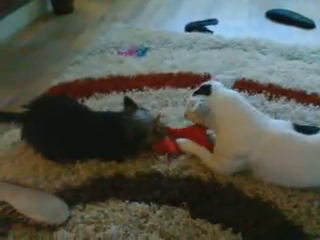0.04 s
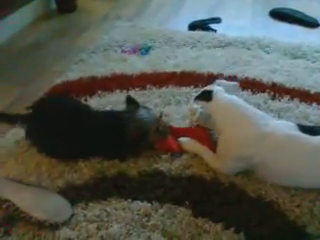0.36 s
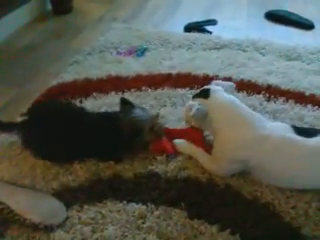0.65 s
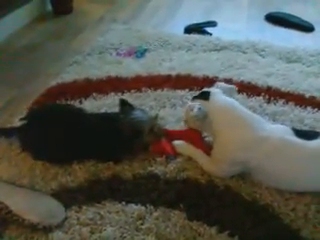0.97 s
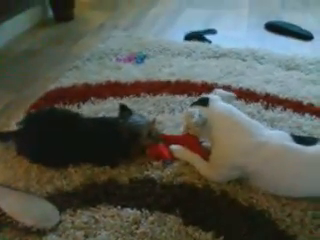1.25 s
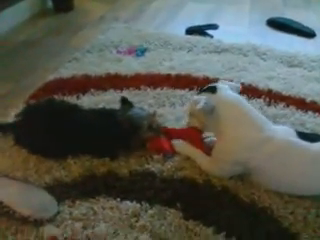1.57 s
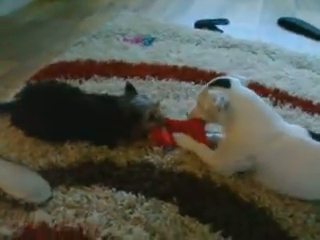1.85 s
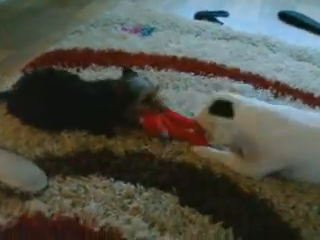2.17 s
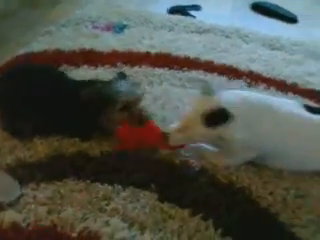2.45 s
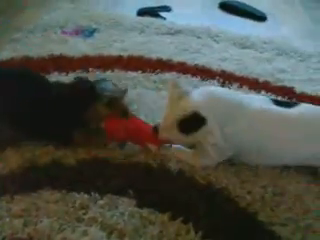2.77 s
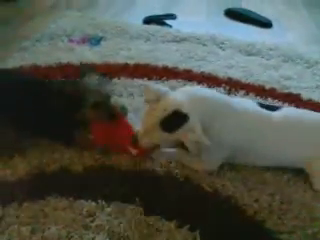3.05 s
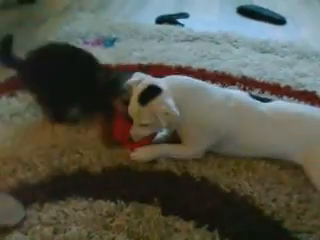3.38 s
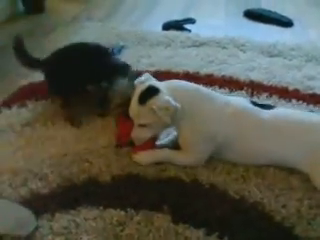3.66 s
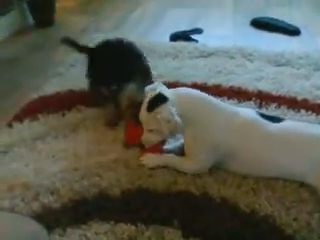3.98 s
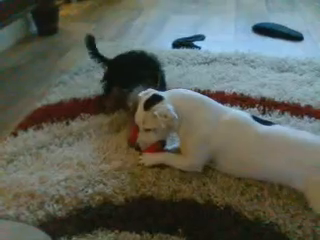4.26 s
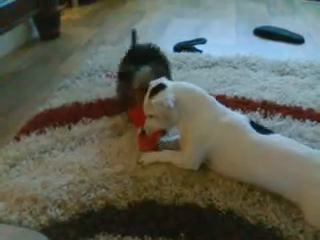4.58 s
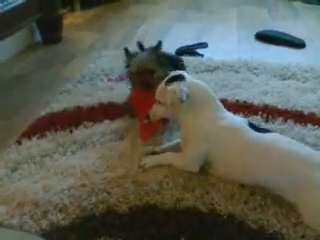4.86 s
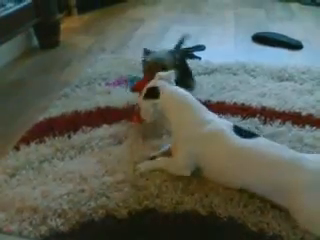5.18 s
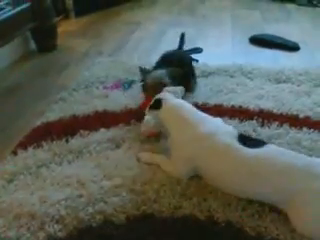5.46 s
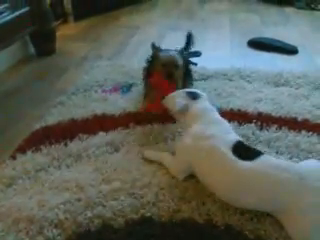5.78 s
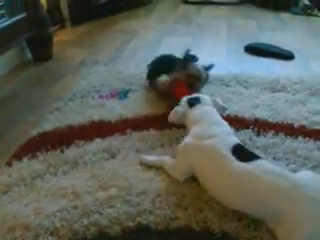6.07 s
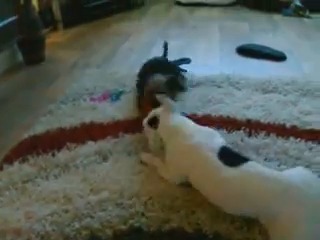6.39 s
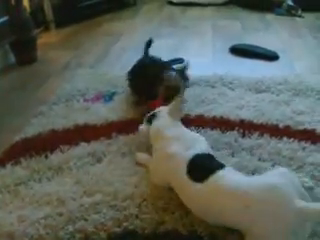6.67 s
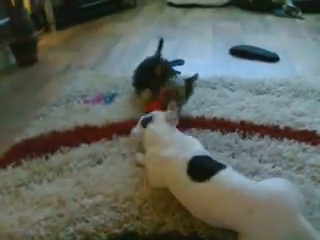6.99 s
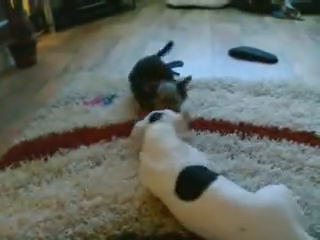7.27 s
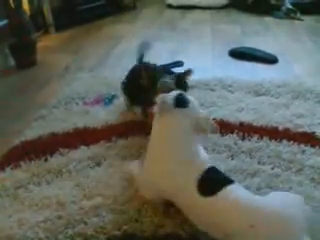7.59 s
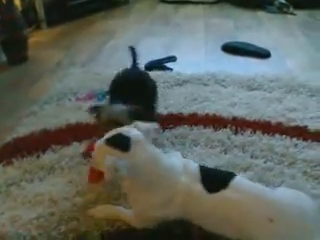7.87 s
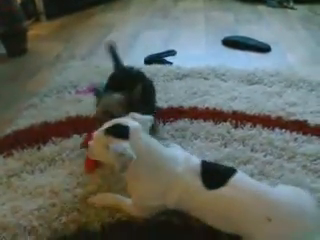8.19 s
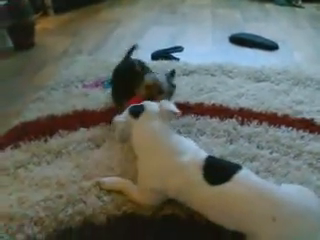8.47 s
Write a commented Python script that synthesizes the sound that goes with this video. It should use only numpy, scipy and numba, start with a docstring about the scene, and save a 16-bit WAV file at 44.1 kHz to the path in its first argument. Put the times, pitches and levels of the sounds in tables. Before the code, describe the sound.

Close, throaty puppy growls come in short repeated bursts during a tug of war, broken by nasal snorts and tooth clicks.

```python
"""Puppy tugging at a toy

A small puppy growls seven times while tugging a toy from another dog on a living-room rug. Each growl
is a rough voice, chopped by a flutter of the throat and shaped by throat and mouth resonances; several
end in a snort through the nose. Brief calls and huffs come between, paws and toy scuff the rug, teeth
click, and a dull microphone close by picks it all up with the reflections of the room."""
import sys
import numpy as np
from scipy import signal
from scipy.fft import rfft, irfft
from scipy.io import wavfile
from scipy.ndimage import uniform_filter1d
from numba import njit

SR = 44100
rng = np.random.default_rng(int(sys.argv[2]) if len(sys.argv) > 2 else 0)


def transcribe(signal):
    """Save signal, clipped to [-1, 1], as a 16-bit WAV file at the path in sys.argv[1]."""
    frames = np.atleast_2d(signal).T
    limited = np.clip(frames, -1, 1)
    pcm = np.round(limited * 32767).astype(np.int16)
    wavfile.write(sys.argv[1], SR, pcm)


N = 384993
TIME = np.arange(N) / SR

# Growls, held back until the push: start_s, length_s, push_after_s, held_back_db, voice_bar_db,
# throat_db, mouth_db, first_pitch_hz, last_pitch_hz, tension (0-1), flutter_hz, throat_hz, mouth_hz
GROWLS = [(0, 0.48, 0.22, 1.5, -35, -32, -42.5, 167.9, 194.9, 0.36, 24.6, 620, 1570),
          (1.285, 0.71, 0.42, 3, -34.5, -32, -44, 196, 189.5, .1, 27.7, 670, 1520),
          (2.521, 0.85, .3, 5, -27.5, -24.5, -26.5, 236.1, 295.3, 0.35, 31.3, 662, 1535),
          (3.788, 0.69, 0.29, 4.5, -30.5, -27.5, -35.5, 227.5, 212.2, 0.13, 28.8, 570, 1576),
          (5.832, .595, .172, 5.5, -32.5, -27.5, -26.5, 308.2, 253.9, 0.63, 26.5, 644, 1480),
          (6.832, .66, 0.22, 0.5, -31.5, -24.5, -25, 296.2, 279.4, .6, 30, 604, 1487),
          (7.828, .66, 0.016, -0.5, -31, -31.5, -23.5, 325.2, 205, 0.45, 27.2, 650, 1482)]


def from_db(db):
    """Amplitude ratio of a level in decibels."""
    return 10 ** (np.asarray(db) / 20)


def rms_one(x):
    """Normalisation to unit power."""
    return x / np.sqrt(np.mean(x ** 2) + 1e-20)


def even(x, seconds=0.086):
    """Division by the running RMS holds the level steady over a few throbs."""
    return x / np.sqrt(np.abs(uniform_filter1d(x * x, int(seconds * SR))) + 1e-14)


def butter(x, hz, kind, order=2):
    """Causal Butterworth filter, maximally flat in its passband."""
    return signal.sosfilt(signal.butter(order, hz, kind, fs=SR, output="sos"), x + 1e-18)


def drift(t, per_s):
    """Slow random modulation: straight lines between Gaussian values of unit spread."""
    knots = np.arange(t[0], t[-1] + 1 / per_s, 1 / per_s)
    return np.interp(t, knots, rng.standard_normal(len(knots)))


def noise(spectrum):
    """Spectral shaping of white noise, at unit power."""
    hz, db = np.transpose(spectrum)
    bin_hz = np.maximum(np.arange(N // 2 + 1) * SR / N, 1)
    gain = from_db(np.interp(np.log(bin_hz), np.log(hz), db))
    return rms_one(irfft(rfft(rng.standard_normal(N)) * gain, N))


def ramp(t, seconds):
    """Linear rise from 0 to 1."""
    return np.clip(t / seconds, 0, 1)


def swell(centre, length, t=TIME):
    """Rounded envelope whose length is its width at half height."""
    return .5 ** np.minimum(np.abs(2 * (t - centre) / length) ** 3, 60)


def puffs(rows, spectrum, grain_db):
    """Short swells of noise, made grainy by fast amplitude modulation."""
    grainy = rms_one(noise(spectrum) * from_db(grain_db * drift(TIME, per_s=400)))
    return grainy * sum(from_db(db) * swell(s, length) for s, length, db in rows)


def impulses(rows):
    """Broadband excitation: one impulse for each time and level."""
    out = np.zeros(N)
    for s, db in rows:
        out[round(s * SR)] = from_db(db)
    return out


@njit
def two_pole(x, angle, radius):
    """Time-varying resonator: pole angle sets the frequency, pole radius the damping."""
    y = np.zeros(len(x))
    for i in range(2, len(x)):
        r = radius[i]
        drive = (1 - r * r) / 2 * (x[i] - x[i - 2])
        y[i] = drive + 2 * r * np.cos(angle[i]) * y[i - 1] - r * r * y[i - 2]
    return y


def resonate(x, hz, width_hz):
    """Band-pass resonance with unit gain at its peak."""
    ones = np.ones(len(x))
    return two_pole(x, 2 * np.pi * hz / SR * ones, np.exp(-np.pi * width_hz / SR * ones))


def flutter(age, first_hz, slowing_hz_per_s=8):
    """Slow oscillation: the throat opens (1) and shuts (-1) at a rate that falls as it tires."""
    turns = first_hz * age - slowing_hz_per_s * age ** 2 / 2
    return -np.cos(2 * np.pi * (turns + .08))


def larynx(t, opening, pitch, tension, slack_jitter=.06, tense_jitter=.045, waver=.035, shimmer_db=4.0):
    """Glottal source: vocal-fold pulses with jitter and shimmer, and turbulence after each closure."""
    jitter = slack_jitter + (tense_jitter - slack_jitter) * tension
    stray = jitter * drift(t, per_s=160) + waver * drift(t, per_s=30)
    cycles = np.cumsum(pitch * (1 + stray + .02 * opening)) / SR
    shimmer = from_db(shimmer_db * np.tanh(drift(t, per_s=300)))
    closures = np.diff(np.floor(cycles), prepend=0) * shimmer
    turbulence = rng.standard_normal(len(t)) * np.exp(-2.5 * (cycles % 1))
    return rms_one(closures) + 0.99 * (1.4 - tension) * rms_one(turbulence)


def tract(source, opening, tension, pitch_hz, bar_db, throat_db, mouth_db, throat_hz, mouth_hz):
    """Parallel formants: the voice leaves by neck wall, throat and mouth, each throbbing with flutter."""
    bar, throat, mouth = (source * from_db(depth_db * opening) for depth_db in (9.0, 6.0, 4.4))
    # The voice bar: the neck wall passes little more than the fundamental.
    bar = butter(butter(bar, 189, "high", order=5), 1.83 * pitch_hz, "low", order=4)
    rumble = butter(rng.standard_normal(len(source)) * from_db(1.8 * opening), [52, 190], "band")
    # Tension narrows both resonances.
    throat = resonate(throat, throat_hz, width_hz=360 ** (1 - tension) * 105 ** tension)
    throat = butter(butter(throat, 455, "high", order=3), 836, "low", order=4)
    mouth = resonate(mouth, mouth_hz, width_hz=560 ** (1 - tension) * 55 ** tension)
    mouth = butter(resonate(mouth, mouth_hz, width_hz=1900), 1730, "low", order=6)
    return (from_db(bar_db) * (even(bar) + from_db(-18.5) * even(rumble))
            - from_db(throat_db) * even(throat) + from_db(mouth_db) * even(mouth))


def growl(start, length, push_s, held_db, bar_db, throat_db, mouth_db,
          first_hz, last_hz, tension, flutter_hz, throat_hz, mouth_hz):
    """Source and filter: effort drives level and tension, snarls lift the mouth formant, the jaw muffles."""
    # Surges of effort as the puppy tugs: centre_s, length_s, gain_db
    surges = [(2.843, 0.045, 2), (3.03, 0.053, 1.5), (4.146, 0.077, 1.5), (6.026, 0.068, 4.5),
              (6.33, 0.044, 3.5), (7.045, 0.063, 5), (7.392, .12, 4), (7.936, 0.21, 4), (8.438, .05, 2.5)]
    # Snarls, when the lips draw back and the mouth rings: centre_s, length_s, gain_db, shift_hz
    snarls = [(0.126, 0.039, 6.5, 22), (2.628, 0.18, 4, 117), (3.228, .24, 5, 146),
              (3.954, 0.053, 12, -14.5), (4.143, 0.15, 2.5, 33), (6.019, 0.055, 3, -1.5),
              (6.143, 0.12, 10, -8), (6.326, 0.057, 4, -16.5), (7.209, 0.051, 5, 132.5),
              (7.377, 0.047, 2.5, -20.5), (7.88, 0.057, 6.5, -120), (8.052, 0.23, 6.5, 21)]
    attack_s, push_rise_s, closing_s, release_s = .012, .012, .11, .055
    build_db_per_s, bar_rise_db_per_s, throat_sag_hz_per_s = 7, 1.5, 45
    tension_per_db, throat_drop_hz_per_db, pitch_lift_hz_per_db = .01, 6, 5
    on = (TIME >= start) & (TIME < start + length + .02)
    t = TIME[on]
    age = t - start
    past_middle = age - length / 2
    held = 1 - ramp(age - push_s + push_rise_s / 2, push_rise_s)
    surge_db = sum(db * swell(s, span, t) for s, span, db in surges)
    effort_db = held * (build_db_per_s * (age - push_s / 2) - held_db) + surge_db
    snarl_db = sum(db * swell(s, span, t) for s, span, db, _ in snarls)
    snarl_hz = sum(hz * swell(s, span, t) for s, span, _, hz in snarls)
    jaw_closing = ramp(age - length + closing_s, closing_s)
    tension = np.clip(tension + tension_per_db * (effort_db - snarl_db), 0, 1)
    # Tongue and jaw never keep still, so the formants wander.
    throat_hz = throat_hz + 18 * drift(t, per_s=18) - throat_drop_hz_per_db * effort_db
    mouth_hz = mouth_hz + 35 * drift(t, per_s=20) + snarl_hz
    # The voice sinks into the chest as the growl goes on.
    throat_hz = throat_hz - throat_sag_hz_per_s * past_middle - 90 * jaw_closing
    bar_db = bar_db + effort_db + bar_rise_db_per_s * past_middle
    throat_db = throat_db + effort_db - .55 * snarl_db - 8.5 * jaw_closing
    mouth_db = mouth_db + effort_db + snarl_db - 2 * jaw_closing
    glide_hz = first_hz + (last_hz - first_hz) * age / length
    pitch = glide_hz + pitch_lift_hz_per_db * surge_db - 18 * jaw_closing
    opening = flutter(age, flutter_hz)
    source = larynx(t, opening, pitch, tension)
    mid_pitch_hz = (first_hz + last_hz) / 2
    voice = tract(source, opening, tension, mid_pitch_hz, bar_db, throat_db, mouth_db, throat_hz, mouth_hz)
    out = np.zeros(N)
    out[on] = voice * ramp(age, attack_s) * ramp(t[-1] - t, release_s)
    return out


def rustle(base_db=-43.5, patchy_db=2.6, grain_db=2.5):
    """Friction noise: fur and cloth rub unevenly on the pile, more in scuffles and after each growl."""
    # Longer scuffles: centre_s, length_s, gain_db
    scuffles = [(1.3, 0.11, 4), (2.4, 0.62, 4), (5.104, 0.74, 2.5), (7.993, 0.23, 12)]
    # Spectrum of the rubbing: frequency_hz, level_db
    spectrum = [(260, -35.5), (450, -4.5), (553, -9.5), (650, -6), (881, -10.5), (1280, -5), (1940, -4.5),
                (2820, -8), (3830, -21.5), (4980, -35.5), (8430, -120)]
    uneven_db = patchy_db * drift(TIME, per_s=25) + grain_db * drift(TIME, per_s=240)
    after_growl_db = 2 * sum(swell(s + length + 0.059, 0.26) for s, length, *_ in GROWLS)
    scuffle_db = sum(db * swell(s, length) for s, length, db in scuffles)
    return noise(spectrum) * from_db(base_db + after_growl_db + scuffle_db + uneven_db)


def reflections(x, level_db=-3.8, t60_s=0.41, first_s=0.0033):
    """Reverberation: dense reflections from floor and walls decay exponentially."""
    t = TIME[:SR // 2]
    tail = rng.standard_normal(len(t)) * from_db(-60 * t / t60_s) * (t > first_s)
    return from_db(level_db) * signal.fftconvolve(x, tail / np.sqrt(np.sum(tail ** 2)))[:N]


def room_tone(level_db=-44):
    """Stationary noise: the quiet background of the room."""
    # Spectrum of the background: frequency_hz, level_db
    spectrum = [(15, -81.5), (25, -41), (64, -11), (135, -12.5), (189, 1.5), (270, -2.5), (306, 4),
                (340, -3.5), (640, -16), (824, -17), (1230, -14.5), (1370, -21), (1550, -3), (2790, -51.5),
                (3830, -44), (4980, -35.5), (8430, -120)]
    return from_db(level_db) * noise(spectrum)


def whines(jitter=.04):
    """Nearly periodic voicing: three harmonics, each weaker than the last, glide down together."""
    # Groans, a grunt and a yip: centre_s, length_s, level_db, pitch_hz, glide_hz_per_s, overtone_step_db
    calls = [(0.398, .085, -28, 309.5, -250, -29), (2.364, .085, -33.5, 224.8, -1200, -24),
             (3.291, .04, -23.5, 301.6, -100, -28), (5.182, .032, -25, 711.4, -300, -17)]
    out = np.zeros(N)
    for s, length, db, hz, glide, step_db in calls:
        pitch = hz + glide * np.clip(TIME - s, -length, length)
        phase = 2 * np.pi * np.cumsum(pitch * (1 + jitter * drift(TIME, per_s=98))) / SR
        tone = sum(from_db(step_db * k) * np.sin((k + 1) * phase) for k in range(3))
        out += rms_one(tone) * from_db(db) * swell(s, length)
    return out


def clicks():
    """Modal ringing: hard contacts of teeth and toy excite quickly damped resonances."""
    # Contacts: time_s, strength_db
    contacts = [(1.344, -22.5), (1.551, -11), (2.511, -23), (2.533, -26.5), (3.803, -25), (3.834, -22.5),
                (5.780, -22), (5.816, -22.5), (6.778, -23.5)]
    # Modes they excite: frequency_hz, gain_db, t60_s
    modes = [(760, -5, 0.042), (1230, 6, 0.0061), (1870, -9, 0.011)]
    hits = impulses(contacts) + 1e-18
    out = np.zeros(N)
    for hz, db, t60 in modes:
        radius, angle = from_db(-60 / (t60 * SR)), 2 * np.pi * hz / SR
        poles = [1, -2 * radius * np.cos(angle), radius * radius]
        out += from_db(db) * signal.lfilter([0, np.sin(angle)], poles, hits)
    return butter(out, 450, "high")


def scuffs():
    """Sliding friction: paws and toy drag briefly over the rug; the last, broader burst is a snort through the
    nose."""
    # Strokes, the last a broad snort: centre_s, length_s, level_db
    strokes = [(1.362, 0.035, -30), (2.03, 0.025, -38.5), (2.145, 0.027, -37), (2.43, .03, -38),
               (2.597, 0.025, -32.5), (5.12, 0.099, -34)]
    # Spectrum of a stroke: frequency_hz, level_db
    spectrum = [(80, -22.5), (200, -2), (700, -0.5), (1700, 3.5), (2500, -0.5), (3400, -2), (4200, -20.5),
                (6000, -69)]
    return puffs(strokes, spectrum, grain_db=2.0)


def snorts(width_hz=480):
    """Filtered turbulence: air rushes through the narrow nose, whose resonance climbs as it tightens."""
    # Nasal blasts: centre_s, length_s, level_db, resonance_hz, rise_hz_per_s
    blasts = [(3.294, 0.11, -34, 1850, 1100), (3.38, 0.035, -36, 2480, 6000), (3.95, 0.2, -33.5, 1970, 15),
              (4.474, 0.031, -35.5, 2440, 3997), (5.234, 0.018, -27.5, 2090, 3),
              (5.249, 0.054, -30, 2730, 2500), (6.387, 0.044, -28, 2260, 2700),
              (7.506, 0.059, -30, 2090, 7995.5), (8.47, 0.027, -27.5, 2450, 13)]
    air, out = rng.standard_normal(N), np.zeros(N)
    for s, length, db, hz, rise in blasts:
        near = np.abs(TIME - s) < 2 * length
        nose_hz = hz + rise * np.clip(TIME[near] - s, -length, length)
        wheeze = resonate(resonate(air[near], nose_hz, width_hz), nose_hz, width_hz)
        out[near] += from_db(db) * swell(s, length)[near] * rms_one(wheeze)
    return out


def huffs():
    """Aspiration noise: short, rough breaths through the throat."""
    # Breaths: centre_s, length_s, level_db
    breaths = [(5.165, 0.026, -25.5), (5.216, 0.044, -25.5), (5.265, 0.046, -33.5), (5.8, 0.052, -37),
               (6.805, 0.054, -34), (7.832, 0.037, -27.5)]
    # Spectrum of a breath: frequency_hz, level_db
    spectrum = [(60, -29.5), (130, -14.5), (220, -8.5), (420, -2), (720, -6.5), (1000, -2.5), (1500, -2),
                (2050, -7), (2600, -23), (3600, -35.5), (4500, -60)]
    return puffs(breaths, spectrum, grain_db=6.0)


def ticks():
    """Broadband transients: thin, bright ticks during the last growl."""
    # Impulses before filtering: time_s, strength_db
    spikes = [(7.888, -10.5), (7.985, -8), (8.063, -15)]
    return butter(impulses(spikes), 6000, "low")


def scene():
    """Superposition of the direct sounds, the reflections of puppy and clicks, and the room tone."""
    puppy = sum(growl(*row) for row in GROWLS) + whines() + snorts() + huffs()
    rug = scuffs() + rustle()
    contacts = clicks()
    echo = reflections(puppy + 0.62 * contacts)
    return (puppy + rug + contacts + echo + room_tone())[None]


def record(dry, ceiling=1.2, microphone_top_hz=3700, cutoff_hz=16000):
    """Soft saturation and band limiting round the peaks and dull the treble; only the ticks reach higher."""
    rounded = ceiling * np.tanh(dry / ceiling)
    dull = signal.sosfilt(signal.cheby1(8, .3, microphone_top_hz, fs=SR, output="sos"), rounded)
    return butter(dull + ticks(), cutoff_hz, "low", order=12)


dry = scene()
out = record(dry)
transcribe(out)
```